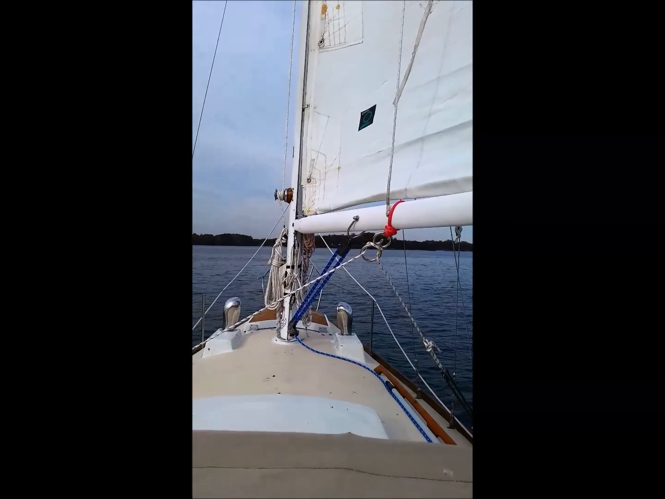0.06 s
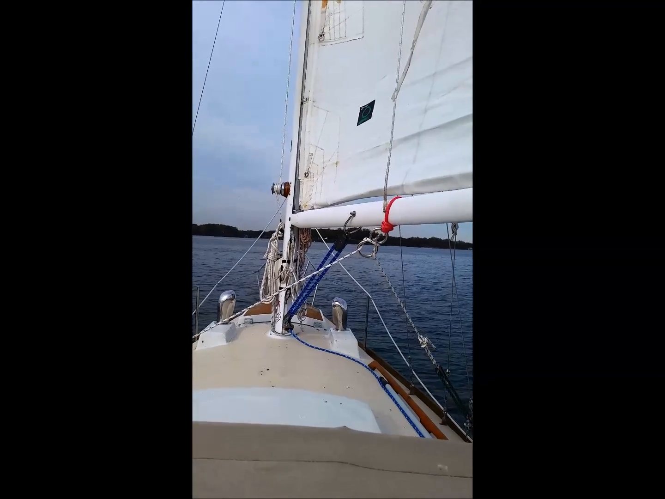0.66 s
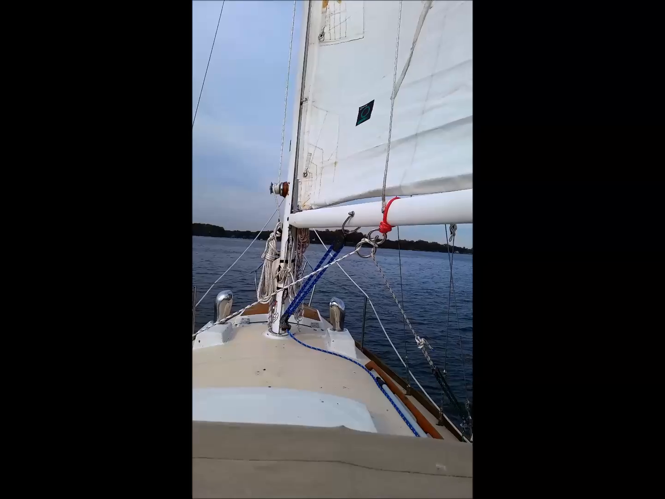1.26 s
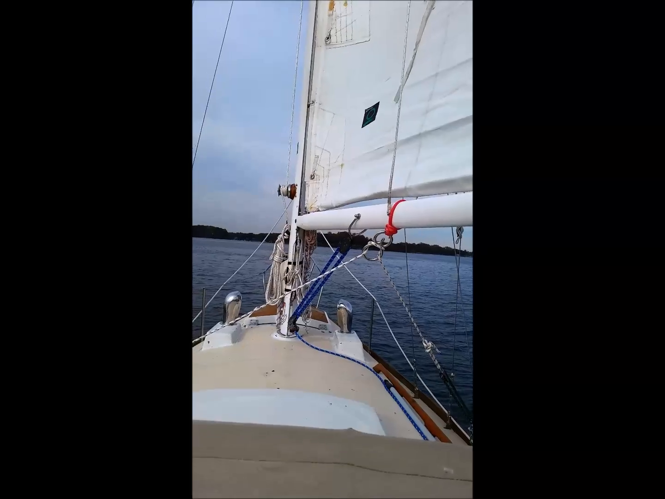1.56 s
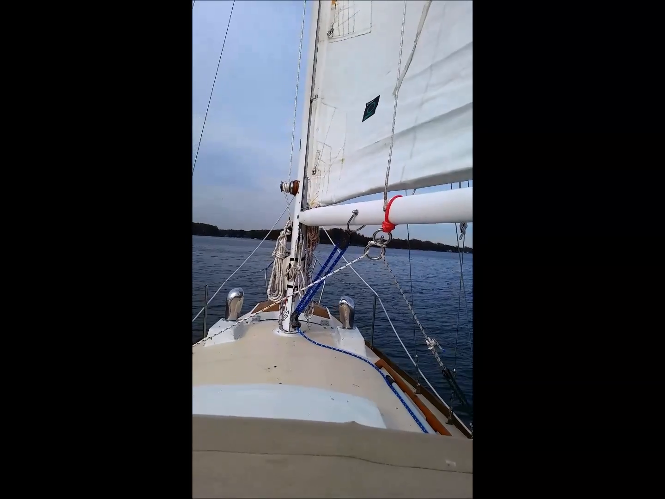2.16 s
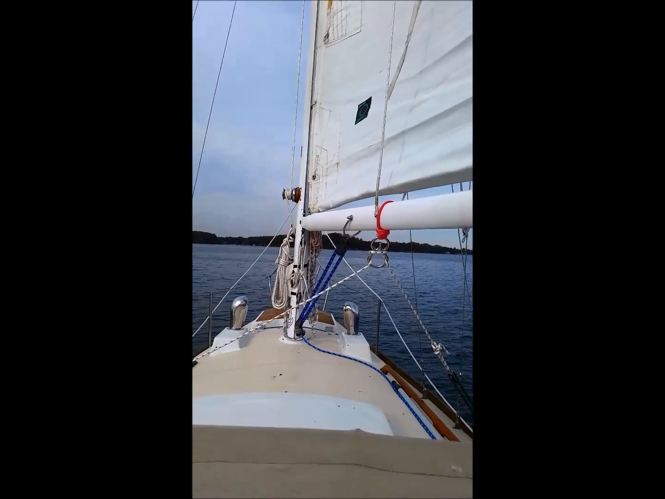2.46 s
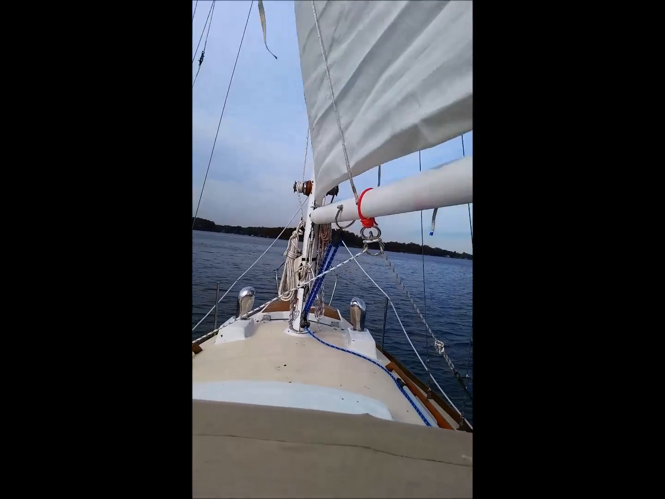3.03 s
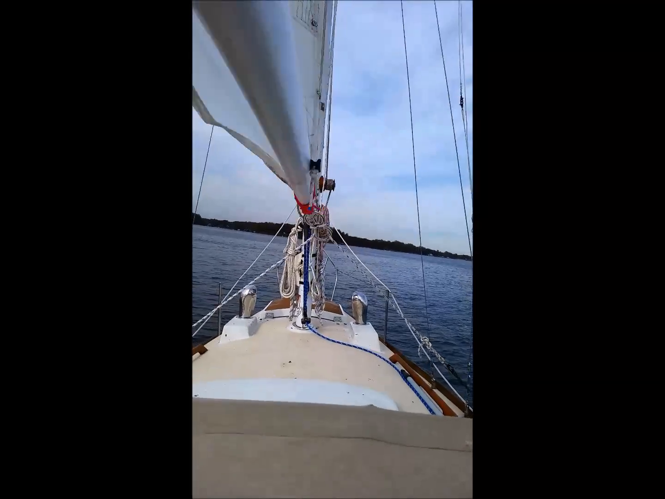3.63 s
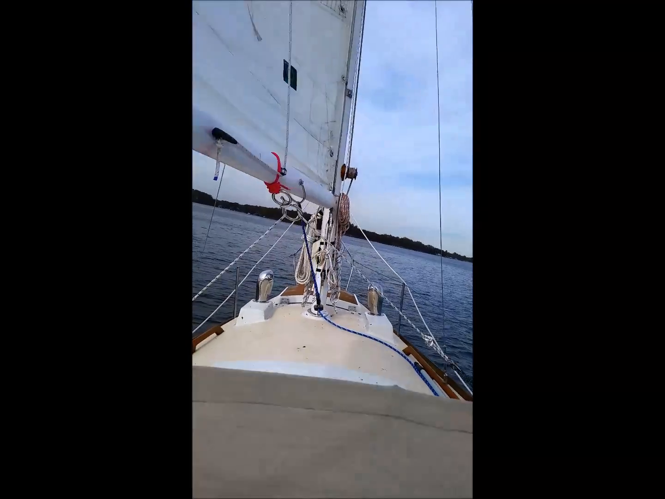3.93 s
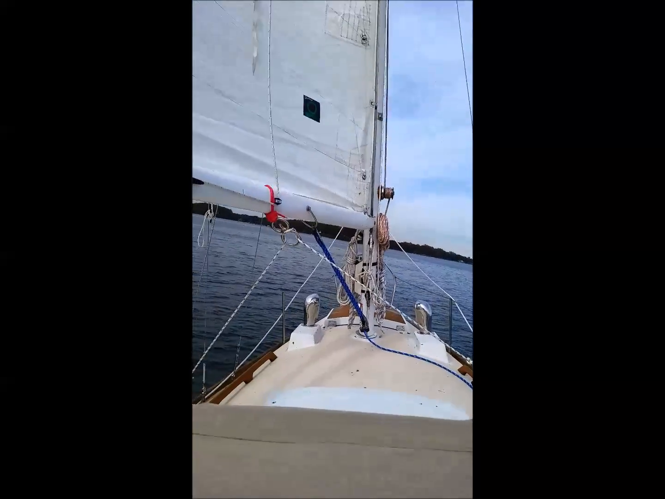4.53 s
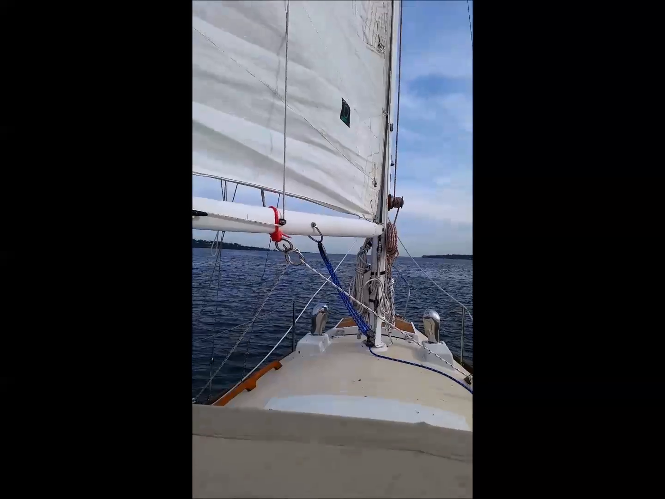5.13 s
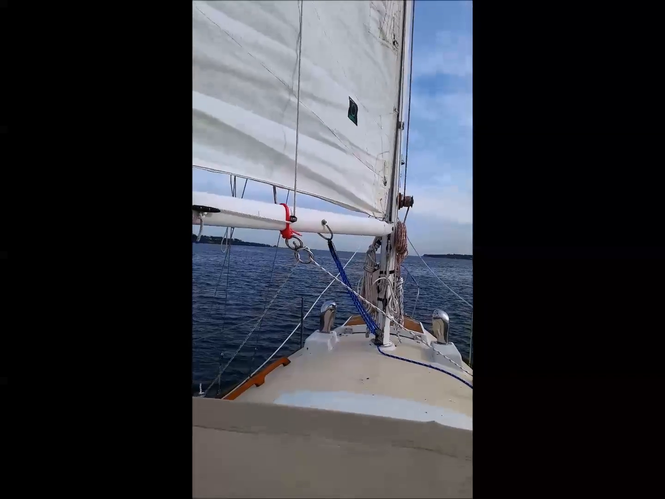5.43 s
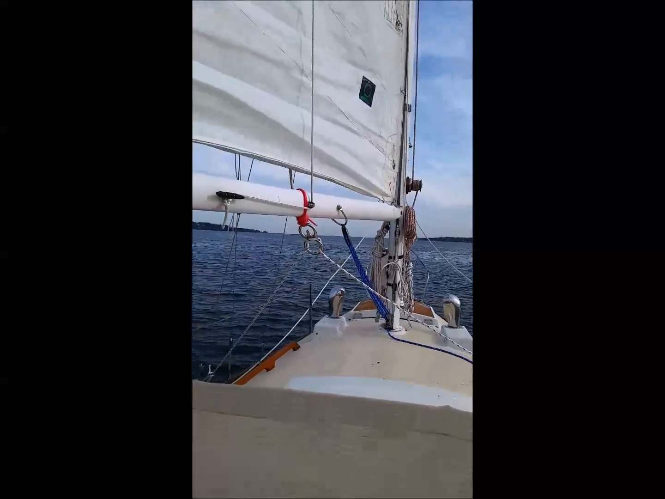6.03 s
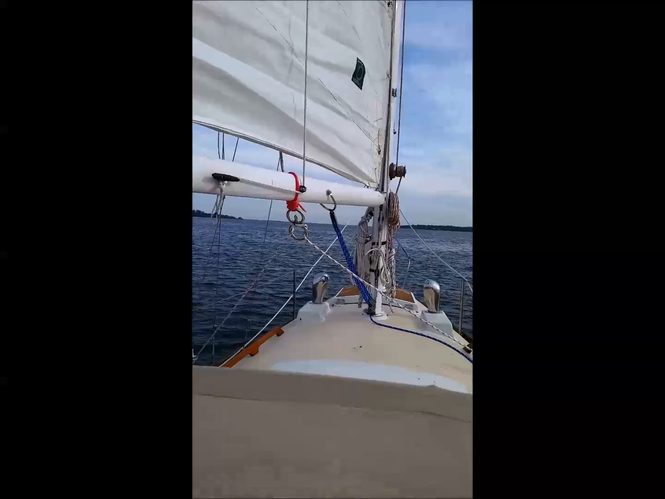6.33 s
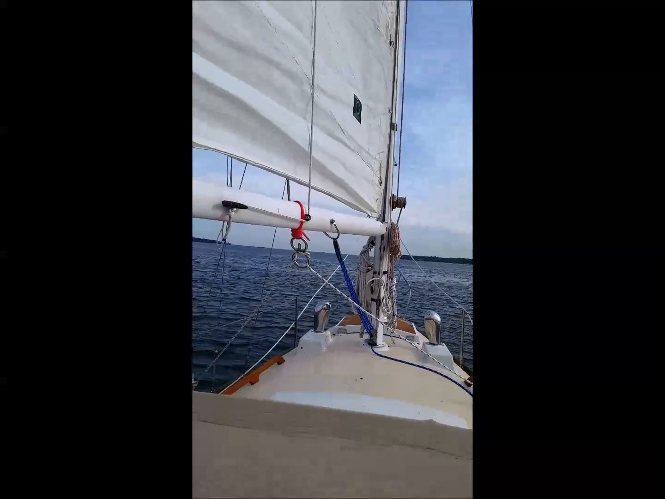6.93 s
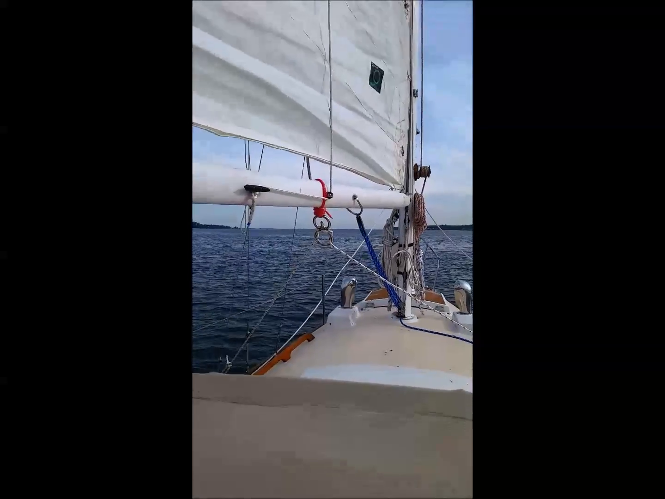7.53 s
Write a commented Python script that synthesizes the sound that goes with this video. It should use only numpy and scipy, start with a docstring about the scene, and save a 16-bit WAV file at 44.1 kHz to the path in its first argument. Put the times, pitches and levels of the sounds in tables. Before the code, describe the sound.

Gusty wind rumble and a faint wash of water, with a sail swinging over, flapping and slamming amid clinking rigging.

```python
"""On board a small yacht gybing on open water: stereo microphone, the rig close ahead, water around.
Wind buffets each microphone port on its own, over a soft wash along the hull. From about 2.5 s the
mainsail rustles and snaps and the pivots squeak as the boom swings over. At 4.4 s the sail fills with
a slam that rattles slides and shackles. At 5 s the hiss cuts off abruptly and creeps back faintly under
gusts, a few ticks of the rigging and a sheet block settling under its new load."""
import sys
import numpy as np
from scipy import signal
from scipy.fft import rfft, irfft, next_fast_len
from scipy.io import wavfile
from scipy.ndimage import uniform_filter1d

SR = 44100
rng = np.random.default_rng(int(sys.argv[2]) if len(sys.argv) > 2 else 0)


def int16_out(signal):
    """Quantize to a 16-bit WAV file."""
    q = np.round(np.clip(np.atleast_2d(signal).T, -1, 1) * 32767)
    wavfile.write(sys.argv[1], SR, q.astype(np.int16))


N = 343539
TIME = np.arange(N) / SR
LEFT, RIGHT = 0, 1

# cloth rustles as the boom swings; the hiss cuts off abruptly at 5 s, then returns faintly:
# time_s, rustle_db, sizzle_db
CLOTH = [(0.0, -65, -72), (0.3, -84.5, -77), (0.45, -71.5, -68.5), (1.1, -91.5, -68.5), (1.45, -70.5, -60),
         (2.42, -71, -55.5), (2.6, -64, -49.5), (3.03, -55.5, -46.5), (3.09, -43, -31), (3.15, -35, -32),
         (3.42, -36.5, -36.5), (3.6, -45.5, -43), (4.22, -52.5, -52.5), (4.45, -46.5, -38.5),
         (4.8, -41.5, -42), (4.98, -50.5, -64), (5.0, -99, -78.5), (5.76, -91, -73), (5.88, -74.5, -42.5),
         (6.05, -81, -71.5), (7.79, -66.5, -61)]
# noise spectrum of the cloth, rope and fittings: frequency_hz, density_db
RIG_COLOUR = [(400, 5), (800, -14), (1400, -16), (1950, -17.5), (2450, -14.5), (3060, -20), (3900, -24),
              (5800, -28.5), (7100, -35.5), (8600, -35), (10200, -14.5), (11800, -8), (14400, -16),
              (15500, -41)]
# the cloth comes taut and its belly flaps: start_s, crack_db, sizzle_db, belly_db, crack_t60_s
SNAPS = [(1.366, -54, -40.5, -54, 0.15), (2.525, -32.5, -29.5, -27.5, 0.12), (3.176, -12.5, -13, -9, 0.058),
         (3.278, -20, -18.5, -25, 0.11), (3.364, -13.5, -8, -23, 0.095), (3.485, -26, -24.5, -32, 0.2),
         (3.552, -25, -33, -50, 0.085), (3.786, -34, -33.5, -40, 0.28), (4.262, -61, -40, -30.5, 0.62),
         (4.312, -48, -29, -18.5, 0.22), (4.358, -27, -10.5, -24, 0.34), (4.414, -23, -28, -20.5, 0.17),
         (4.468, -33.5, -34, -31, 0.34), (4.626, -34, -22, -43, 0.096), (4.67, -25.5, -16.5, -42, 0.1),
         (4.723, -31, -18.5, -48, 0.06), (4.795, -33, -27, -71, 0.11), (4.859, -50, -60, -20.5, 0.076),
         (4.885, -54, -54, -28, 0.043), (5.81, -44, -47.5, -29, 0.33), (6.565, -55, -52.5, -55, 0.59),
         (7, -38.5, -53, -35, 0.13)]
# the slam jolts the shackle and slides: start_s, level_db
JOLTS = [(4.355, -25), (4.389, -16.5), (4.404, -33.5)]


def from_db(db):
    """Decibels to gain."""
    return 10 ** (np.asarray(db) / 20)


def unit_rms(x):
    """Scale to unit power."""
    return x / np.sqrt(np.mean(x ** 2) + 1e-20)


def in_time(rows):
    """The columns of a curve, sample by sample."""
    times, *columns = np.transpose(rows)
    return [np.interp(TIME, times, column) for column in columns]


def at_hz(points, hz):
    """Read a spectrum on a log-frequency axis."""
    points_hz, points_db = np.transpose(points)
    return np.interp(np.log(hz), np.log(points_hz), points_db)


def butter(x, hz, kind, order=2):
    """Causal low- or high-pass."""
    return signal.sosfilt(signal.butter(order, min(hz, .45 * SR), kind, fs=SR, output="sos"), x)


def drift(rate_hz, channels=1):
    """Smooth random wander of spread 1, mostly slower than rate_hz."""
    step = 20
    size = N // step + 2
    hz = np.fft.rfftfreq(size, step / SR)
    slow = irfft(rfft(rng.standard_normal((channels, size))) / (1 + (hz / rate_hz) ** 2) ** 2)
    return np.array([np.interp(np.arange(N) / step, np.arange(len(row)), unit_rms(row)) for row in slow])


def noise(colour, low_hz, high_hz, airborne=True):
    """A band of coloured stereo noise: shared by the ports if airborne, else independent at each."""
    # stereo width at the microphone: frequency_hz, side_over_mid_db
    width = [(60, 17), (150, -1.5), (380, -18), (950, 4), (2380, 1), (5980, -1.5), (12000, -0.5)]
    # balance between the ports: frequency_hz, left_over_right_db
    balance = [(120, -4), (240, -3.5), (480, -6), (1300, 3), (2400, 1), (4400, -10.5), (8100, 6.5),
               (12000, 3.5)]
    size = next_fast_len(N, True)
    hz = np.fft.rfftfreq(size, 1 / SR) + 1
    left, right = rfft(rng.standard_normal((2, size)))
    if airborne:
        mid, side = left, right * from_db(at_hz(width, hz))
        lean = from_db(at_hz(balance, hz) / 2)
        left, right = (mid + side) * lean, (mid - side) / lean
    edges = 1 / np.sqrt((1 + (low_hz / hz) ** 8) * (1 + (hz / high_hz) ** 8))
    spectrum = np.array([left, right]) * from_db(at_hz(colour, hz)) * edges
    return unit_rms(irfft(spectrum, size)[:, :N])


def add(out, start_s, sound):
    """Mix a sound in at a time."""
    start = max(round(start_s * SR), 0)
    out[..., start:start + sound.shape[-1]] += sound[..., :N - start]


def burst(level_db, t60_s, attack_s):
    """Power of a sound that jumps up and dies away."""
    t = TIME[:SR // 2]
    return (from_db(level_db - 60 * t / max(t60_s, .01)) * (1 - np.exp(-t / attack_s))) ** 2


def ring(clicks, modes, scatter_db):
    """Each click strikes every mode with a strength and sign of its own in each channel."""
    out, struck = np.zeros((2, N)), np.flatnonzero(clicks)
    for hz, level_db, t60_s in modes:
        strength = from_db(level_db + scatter_db * rng.standard_normal((len(struck), 2)).T)
        sign = rng.choice([-1, 1], (len(struck), 2)).T
        hits = np.full((2, N), 1e-18)
        hits[:, struck] = clicks[struck] * strength * sign
        radius, angle = from_db(-60 / (t60_s * SR)), 2 * np.pi * hz / SR
        out += signal.lfilter([0, np.sin(angle)], [1, -2 * radius * np.cos(angle), radius ** 2], hits)
    return out


def on_port(port, shadow_db):
    """Left and right gains of a sound that hits one port and is weaker at the other."""
    return np.where(np.arange(2) == port, 1, from_db(shadow_db))[:, None]


def airflow(shadow_db=-28, lee_db=-2.0):
    """Wind level at each port in dB: a slow breeze plus gusts, each leaving the other port in the lee."""
    # the breeze over both ports, dropping while the sail fills on the new side: time_s, level_db
    breeze = [(0, -26), (.6, -31), (.8, -37), (1.1, -36.5), (1.87, -30.5), (2.03, -30.5), (2.85, -24.5),
              (3.0, -25), (3.3, -20.5), (4.25, -26.5), (4.45, -27), (4.6, -40), (4.9, -40), (5.1, -31),
              (5.5, -38), (5.8, -32), (6.3, -27), (6.5, -32), (7.79, -27)]
    # a gust swells and fades on one port: middle_s, length_s, level_db, port
    gusts = [(0.144, 0.081, -11, LEFT), (0.244, 0.045, -22, LEFT), (0.28, 0.017, -13.5, RIGHT),
             (0.338, 0.041, -14, LEFT), (0.409, 0.035, -11.5, RIGHT), (0.455, 0.054, -16, LEFT),
             (0.524, 0.047, -26.5, LEFT), (0.59, 0.14, -17, LEFT), (0.636, 0.07, -29.5, RIGHT),
             (0.689, 0.011, -14.5, LEFT), (0.766, 0.031, -31.5, LEFT), (0.869, 0.11, -20.5, LEFT),
             (1.165, 0.01, -21, LEFT), (1.276, 0.067, -20.5, RIGHT), (1.285, 0.19, -19.5, LEFT),
             (1.432, .14, -16.5, LEFT), (1.495, 0.022, -28.5, RIGHT), (1.618, 0.027, -14, LEFT),
             (1.712, 0.041, -13.5, LEFT), (1.887, 0.025, -12, LEFT), (1.992, 0.022, -10.5, LEFT),
             (1.993, 0.059, -14, RIGHT), (2.049, 0.018, -15, LEFT), (2.112, 0.046, -12.5, RIGHT),
             (2.17, 0.043, -26, LEFT), (2.204, 0.026, -16, RIGHT), (2.229, 0.09, -17, LEFT),
             (2.306, 0.03, -19.5, LEFT), (2.361, 0.019, -12, LEFT), (2.368, 0.11, -15.5, RIGHT),
             (2.462, 0.036, -14, RIGHT), (2.502, 0.053, -20.5, LEFT), (2.588, 0.055, -11.5, LEFT),
             (2.653, 0.03, -17, LEFT), (2.677, 0.029, -25, RIGHT), (2.719, 0.014, -21.5, RIGHT),
             (2.777, 0.045, -14, LEFT), (2.779, 0.035, -13.5, RIGHT), (2.83, 0.045, -17, RIGHT),
             (2.937, 0.038, -14.5, LEFT), (3.036, 0.051, -12, RIGHT), (3.269, 0.099, -13, RIGHT),
             (3.442, 0.073, -16.5, RIGHT), (3.45, 0.099, -22, LEFT), (3.617, 0.044, -14.5, RIGHT),
             (3.727, 0.028, -20, RIGHT), (3.806, 0.11, -17.5, LEFT), (3.931, 0.058, -13.5, RIGHT),
             (4.078, 0.034, -18, LEFT), (4.185, 0.12, -20.5, RIGHT), (4.247, 0.091, -18.5, LEFT),
             (5.12, 0.017, -16.5, RIGHT), (5.227, 0.072, -22, LEFT), (5.342, 0.055, -20, RIGHT),
             (5.428, 0.058, -26.5, LEFT), (5.572, 0.16, -29.5, LEFT), (5.64, 0.036, -21, RIGHT),
             (5.772, 0.074, -21, LEFT), (5.858, 0.025, -18, RIGHT), (5.998, 0.073, -18, LEFT),
             (6.052, 0.079, -17, RIGHT), (6.245, 0.044, -17.5, RIGHT), (6.372, 0.054, -16, LEFT),
             (6.431, 0.018, -13, LEFT), (6.51, 0.088, -16.5, LEFT), (6.703, 0.12, -18.5, LEFT),
             (6.755, 0.11, -13, RIGHT), (6.826, 0.071, -13.5, RIGHT), (6.921, 0.016, -17.5, LEFT),
             (7.015, 0.11, -15, LEFT), (7.16, 0.074, -14.5, LEFT), (7.285, 0.072, -22, RIGHT),
             (7.401, 0.081, -15.5, LEFT), (7.498, 0.026, -12.5, LEFT), (7.551, 0.011, -11.5, LEFT),
             (7.78, 0.099, -13.5, LEFT)]
    breeze_db, gust_power = in_time(breeze)[0], 0
    for middle_s, length_s, level_db, port in gusts:
        swell = np.exp(-np.minimum((2 * (TIME - middle_s) / length_s) ** 2, 20))
        gust_power = gust_power + (from_db(level_db) * on_port(port, shadow_db)) ** 2 * swell
        breeze_db = breeze_db + lee_db * (np.arange(2) != port)[:, None] * swell
    return 10 * np.log10(from_db(breeze_db) ** 2 + gust_power)


def wind(rumble_db=5.0, flutter_db=1.5, steepening=0.54, reference_db=-18,
         rumble_lumps_db=3.5, flutter_lumps_db=5.5, edge_lumps_db=8.5):
    """Turbulence on each port: strong gusts are brighter, and smaller eddies come more in lumps."""
    # faster air sheds smaller eddies: time_s, brightness_db
    brightness = [(0, -4), (.7, -5.5), (1.0, -8.5), (2.5, -9), (3.0, 4.5), (4.5, 1.5), (5.0, 8), (5.4, 13),
                  (6.0, 6), (7.79, 1)]
    # spectrum of the turbulence: frequency_hz, density_db
    colour = [(20, -18), (46, -3), (70, 0), (105, 0), (165, -5), (250, -12), (400, -22), (600, -35),
              (900, -50), (1400, -59.5), (2200, -66)]
    level_db = airflow()
    bright_db = in_time(brightness)[0] + steepening * (level_db - reference_db)
    lumps = 1.7 * np.tanh(drift(51, channels=2))
    lumps -= uniform_filter1d(lumps, size=SR // 9)   # lumps flicker inside a gust without swelling it
    air = noise(colour, 30, 1500, airborne=False)
    air /= np.sqrt(uniform_filter1d(air ** 2, size=SR // 20))   # the airflow alone sets the slow level
    below_flutter = signal.sosfiltfilt(signal.butter(3, 260, fs=SR, output="sos"), air)
    below_edge = signal.sosfiltfilt(signal.butter(3, 700, fs=SR, output="sos"), air)
    rumble = below_flutter * from_db(rumble_db + rumble_lumps_db * lumps)
    flutter = (below_edge - below_flutter) * from_db(flutter_db + bright_db + flutter_lumps_db * lumps)
    edge = (air - below_edge) * from_db(bright_db + edge_lumps_db * lumps)
    return (rumble + flutter + edge) * from_db(level_db)


def ports(pressure, ceiling=0.98, muffle_hz=1700):
    """Strong buffets overload the microphone ports softly; the wind stays muffled."""
    return butter(ceiling * np.tanh(pressure / ceiling), muffle_hz, "low", order=5)


def water(ripple_db=3.0):
    """Soft wash along the hull, all around the microphone."""
    # wash along the hull; the hiss cuts off abruptly at 5 s, then creeps back: time_s, level_db
    wash = [(0, -51.5), (1.0, -58), (1.4, -52), (2.4, -49.5), (4.97, -44), (5.0, -69), (5.7, -67),
            (5.9, -58), (7.79, -54)]
    # spectrum of the wash: frequency_hz, density_db
    colour = [(300, 11), (700, 2), (1300, -5.5), (2000, -14.5), (3000, -22), (5000, -21.5), (6500, -39)]
    level_db, = in_time(wash)
    return from_db(level_db + ripple_db * drift(18)) * noise(colour, 260, 7600, airborne=False)


def crinkle(per_s, spread_db, grain_s):
    """Envelope of tiny creases popping at random, each dying quickly; rms 1."""
    pops = rng.random(N) < per_s / SR
    power = pops * from_db(spread_db * np.minimum(rng.exponential(1, N), 4)) ** 2
    return unit_rms(np.sqrt(signal.lfilter([1], [1, -np.exp(-1 / (grain_s * SR))], power + 1e-18)))


def sail(rustle_gain_db=3.0, snap_body_db=-1.5, snap_sizzle_db=-7.0, crackle_db=-10.5):
    """Stiff cloth crinkles as it slides, and cracks in bursts of creases when it comes taut."""
    rustle_db, sizzle_db = in_time(CLOTH)
    # larger folds flip one by one
    folds = 0.13 + (from_db(crackle_db) * crinkle(per_s=47, spread_db=0.8, grain_s=0.009)) ** 2
    body_power = folds * from_db(rustle_db + rustle_gain_db) ** 2
    top_power = folds * from_db(sizzle_db) ** 2
    for start_s, crack_db, top_db, _, t60_s in SNAPS:
        add(body_power, start_s, burst(crack_db + snap_body_db, t60_s, attack_s=0.019))
        add(top_power, start_s, burst(top_db + snap_sizzle_db, t60_s, attack_s=0.0021))
    creases = .45 + .6 * crinkle(per_s=800, spread_db=3.5, grain_s=.001)
    body = np.sqrt(body_power) * noise(RIG_COLOUR, 800, 9000)
    top = np.sqrt(top_power) * noise(RIG_COLOUR, 5400, 12000)
    return creases * (body + top)


def slides(gain_db=2.5, per_s=30, spread_db=1.5):
    """Moving cloth shakes the slides in their track: dry, random clicks under the rustle."""
    # a sail slide's heavily damped modes: pitch_hz, level_db, t60_s
    modes = [(2600, 1, 0.013), (3330, -1, 0.0088), (4170, -4, 0.007), (5100, -10, 0.0061)]
    rustle_db, _ = in_time(CLOTH)
    strength_db = spread_db * np.clip(rng.standard_normal(N), -2, 2)
    knocks = (rng.random(N) < per_s / SR) * from_db(rustle_db + gain_db + strength_db)
    return ring(knocks, modes, scatter_db=4.5)


def fittings(tick_gain_db=-3.5, clack_gain_db=-4.0, rattle_gain_db=16.5):
    """Metal on metal: a dry tick and a duller clack; a jolt rattles the slides and rings the shackle."""
    # slides and shackles knock: start_s, tick_db, clack_db
    knocks = [(0.079, -46, -43.5), (0.974, -49, -47.5), (1.355, -29.5, -37.5), (1.929, -38.5, -46),
              (1.988, -29, -40), (2.012, -23.5, -34.5), (2.274, -30, -36.5), (2.904, -25, -39),
              (2.93, -19, -33), (3.178, -12, -13), (3.187, -4, -38), (3.355, -34, -36), (3.371, -19, -33),
              (3.381, -18.5, -40), (3.488, -13, -33), (3.521, -29.5, -38), (3.557, -30, -30),
              (3.641, -22, -55), (3.711, -19.5, -40), (4.033, -38, -42), (4.069, -21, -30.5),
              (4.357, -3.5, -34), (4.374, -19, -26), (4.414, -3, -35), (4.429, -19, -23), (4.47, -33, -25),
              (4.513, -22, -42), (4.565, -24.5, -33), (4.668, -8.5, -45), (4.796, -28, -38),
              (4.887, -52, -21.5), (4.923, -26, -49), (5.453, -24.5, -53), (5.91, -32, -52),
              (6.006, -53, -39), (6.56, -33, -51.5), (6.848, -44, -50), (6.982, -32, -41.5),
              (7.016, -30, -43), (7.464, -29.5, -44), (7.634, -34.5, -45.5)]
    # the shackle's modes: pitch_hz, level_db, t60_s
    shackle_modes = [(10300, -7, .1), (11165, -5.5, .2), (11320, -14.5, .22), (11495, -5, .2),
                     (11660, -12.5, .2), (11805, -8, .2), (12050, -9, .14), (12420, -14.5, .14)]
    blows, tick_power, clack_power = np.zeros((3, N))
    for start_s, tick_db, clack_db in knocks:
        add(tick_power, start_s, burst(tick_db + tick_gain_db, t60_s=0.013, attack_s=.0003))
        add(clack_power, start_s, burst(clack_db + clack_gain_db, t60_s=0.031, attack_s=.0003))
    for start_s, blow_db in JOLTS:
        add(blows, start_s, from_db([blow_db]))
        add(tick_power, start_s, burst(blow_db + rattle_gain_db, t60_s=0.027, attack_s=0.0062))
    ticks = np.sqrt(tick_power) * noise(RIG_COLOUR, 7400, 22000)
    clacks = np.sqrt(clack_power) * noise(RIG_COLOUR, 1200, 5700)
    return ticks + clacks + ring(blows, shackle_modes, scatter_db=3.5)


def eddies(gain_db=1.0, wake_db=-27, wake_s=0.0035, wake_hz=400, shadow_db=-22, lead_s=.012):
    """An eddy's core crosses a port as one quick swing in pressure, trailed by a turbulent wake."""
    # single eddies bursting on a port, small ones sounding higher: middle_s, level_db, pitch_hz, port
    crossings = [(0.115, -11.5, 131, LEFT), (0.192, -10.5, 102.4, LEFT), (0.279, -12.5, 200, RIGHT),
                 (0.398, -10.5, 131, RIGHT), (2.809, -4, 173, RIGHT), (3.01, -16.5, 317, RIGHT),
                 (3.018, -17, 184, RIGHT), (3.046, -14, 265, RIGHT), (3.067, -9, 165, RIGHT),
                 (4.28, -14.5, 290, RIGHT), (4.32, -13, 250, LEFT), (5.266, -10, 115, LEFT),
                 (5.331, -16, 240, RIGHT), (5.343, -12, 181, RIGHT), (5.367, -17.5, 170, RIGHT),
                 (5.634, -22.5, 149.6, RIGHT), (5.649, -14.5, 199, RIGHT), (5.769, -14, 149, LEFT),
                 (6.009, -17, 258, LEFT), (6.035, -13.5, 204, RIGHT), (6.348, -19.5, 162, LEFT),
                 (6.427, -14, 150, LEFT), (6.529, -8, 233, LEFT), (6.535, -7.5, 170, LEFT),
                 (6.726, -3, 160, RIGHT), (6.772, -8.5, 195, RIGHT), (6.797, -10, 240, RIGHT),
                 (6.871, -23, 300, LEFT), (7.002, -8.5, 170, LEFT), (7.021, -17, 149, LEFT),
                 (7.139, -8.5, 150, LEFT), (7.483, -6, 162, LEFT)]
    out, t = np.zeros((2, N)), TIME[:SR // 16] - lead_s
    for middle_s, level_db, hz, port in crossings:
        across = 2 * np.pi * hz * t
        core = across / (1 + across ** 2) ** 2
        churn = unit_rms(butter(rng.standard_normal(len(t)), wake_hz, "low"))
        wake = from_db(wake_db) * churn * (t > 0) * np.exp(-np.abs(t) / (2 * wake_s))
        pressure = (wake - core / core.max()) * from_db(level_db + gain_db)
        add(out, middle_s - lead_s, pressure * on_port(port, shadow_db))
    return out


def flaps(t60_ratio=0.78):
    """At each snap the whole panel of cloth shakes with a low, papery whump."""
    # spectrum of the sail's belly: frequency_hz, density_db
    colour = [(400, 9.5), (850, 4.5), (1300, -6.5), (1900, -14), (2300, -15)]
    power = np.zeros(N)
    for start_s, _, _, belly_db, crack_t60_s in SNAPS:
        add(power, start_s, burst(belly_db, t60_ratio * crack_t60_s, attack_s=0.0045))
    return np.sqrt(power) * noise(colour, 180, 2100)


def squeaks(lag_s=0.00032):
    """Stick-slip in a loaded pivot: uneven slips make a hoarse creak around a pitch and its octave."""
    # gooseneck and blocks squeak: middle_s, length_s, pitch_hz, level_db, octave_db
    creaks = [(2.851, 0.045, 980, -38, -12), (3.429, .026, 2420, -34.5, -33), (3.67, 0.067, 2636, -35, -20),
              (4.273, 0.024, 923, -30.5, -35), (4.54, 0.034, 985, -30.5, -34)]
    slip, stick = np.tanh(drift(190, channels=2))
    quiver = .72 + .78 * (slip + 1j * stick)   # wavers in both level and phase
    out = np.zeros(N)
    for middle_s, length_s, hz, level_db, octave_db in creaks:
        near = np.abs(TIME - middle_s) < 2 * length_s
        swell = np.exp(-(2 * (TIME[near] - middle_s) / length_s) ** 4)
        tone = quiver[near] * np.exp(2j * np.pi * hz * TIME[near])
        creak = np.real(tone + from_db(octave_db) * tone ** 2)
        out[near] += from_db(level_db) * np.sqrt(2) * swell * creak
    return np.array([np.interp(TIME - lag_s, TIME, out), out])   # reaches the right port first


def clatter(level_db=-38, per_s=170, hold_s=0.07, t60_s=0.14):
    """After the slam the slides bounce along the boom, hard at first, then settling."""
    # the hollow boom's modes: pitch_hz, level_db, t60_s
    boom_modes = [(762, -1.5, 0.053), (1290, -7.5, 0.052), (1690, -6.5, 0.095), (1820, 0.5, .06),
                  (2040, -0.5, 0.047), (3630, -4, 0.11)]
    since_slam = TIME - JOLTS[0][0]
    settling_db = -60 * np.clip(since_slam - hold_s, 0, 2 * t60_s) / t60_s
    bounces = (rng.random(N) < per_s / SR) * (since_slam > 0) * from_db(level_db + settling_db)
    return ring(bounces, boom_modes, scatter_db=3.5)


def block():
    """The sheave knocks in its shell with a short, narrow clink and a thin tick on top."""
    # a sheet block settles under its new load: start_s, level_db
    knocks = [(6.311, -56), (6.467, -57), (6.835, -49), (7.105, -56.5), (7.166, -60), (7.327, -54.5),
              (7.399, -48.5), (7.45, -48.5)]
    power = np.zeros(N)
    for start_s, level_db in knocks:
        add(power, start_s, burst(level_db, t60_s=0.068, attack_s=0.00019))
    clink = noise([(2000, -7), (2600, 0), (3200, -11)], 1500, 4200)
    tick = noise(RIG_COLOUR, 9000, 15000)
    return np.sqrt(power) * (clink + tick)


def sheet(strands_per_s=150, ridge_db=10.0, shadow_db=-8):
    """Rope hisses through the block left of the microphone, pulsing as its strands pass the sheave."""
    # a short length of sheet runs through its block: time_s, level_db
    run = [(7.0, -81.5), (7.022, -60.5), (7.065, -64), (7.1, -79)]
    level_db = np.interp(TIME, *np.transpose(run), left=-200, right=-200)
    strand_hz = strands_per_s * (1 + .2 * drift(60)[0])
    strands = np.sin(2 * np.pi * np.cumsum(strand_hz) / SR)
    hiss = noise(RIG_COLOUR, 3900, 5200, airborne=False)
    return from_db(level_db + ridge_db * strands) * hiss * on_port(LEFT, shadow_db)


def scene():
    """Wind at the ports, the rig ahead, the water around."""
    buffeting = ports(wind() + eddies())
    rig = sail() + flaps() + fittings() + clatter() + slides() + block() + sheet() + squeaks()
    return buffeting + rig + water()


def record(dry, cutoff_hz=14900):
    """The recorder clips the peaks and cuts the top treble."""
    return signal.sosfilt(signal.ellip(10, .2, 70, cutoff_hz, fs=SR, output="sos"), np.clip(dry, -1, 1))


dry = scene()
out = record(dry)
int16_out(out)
```